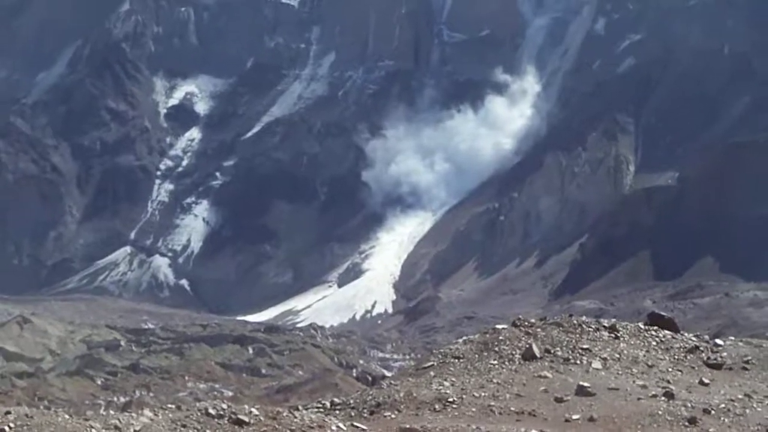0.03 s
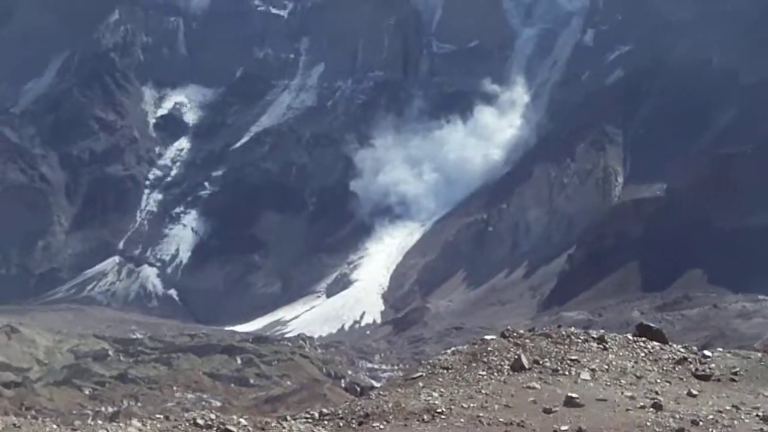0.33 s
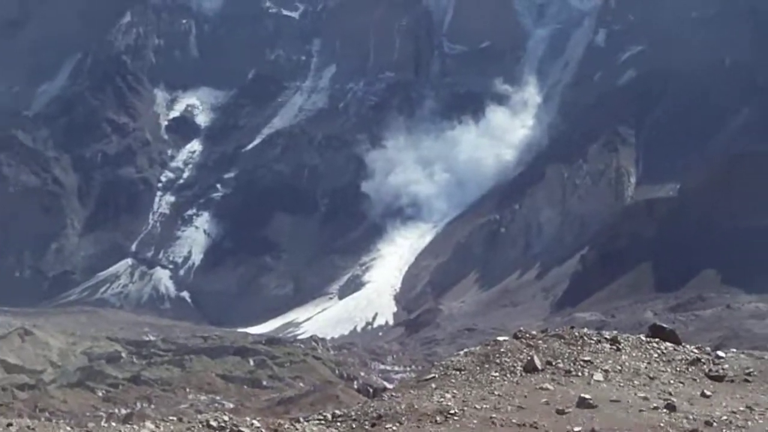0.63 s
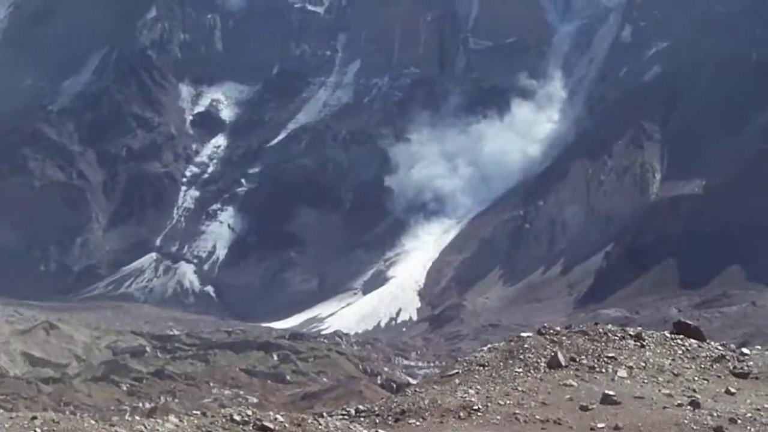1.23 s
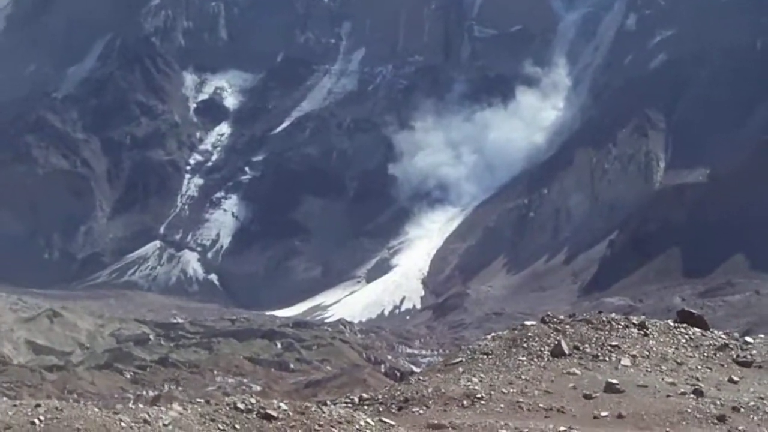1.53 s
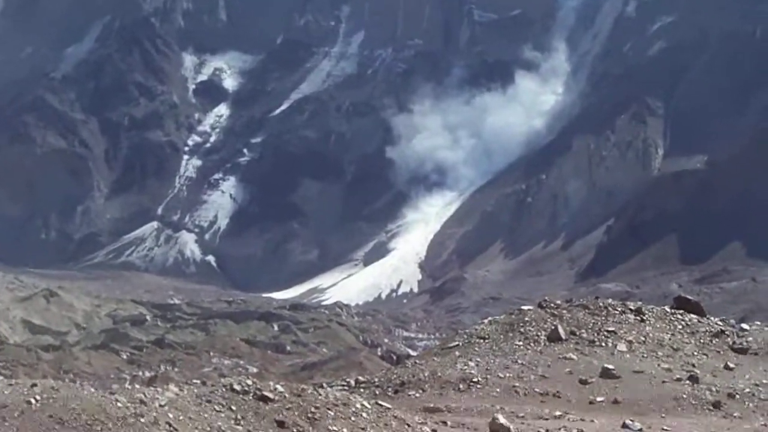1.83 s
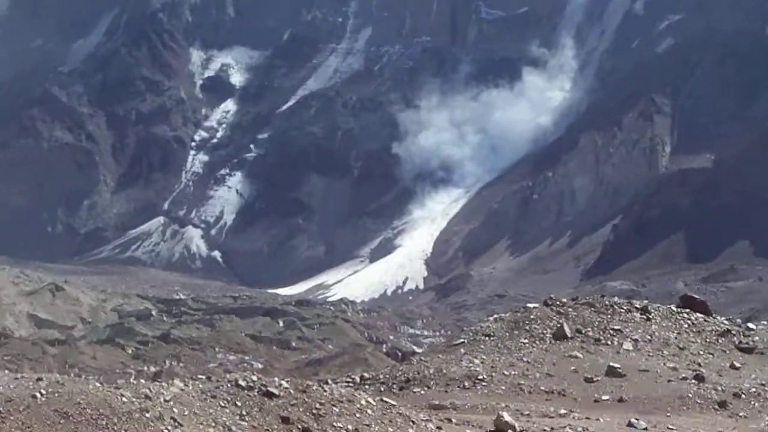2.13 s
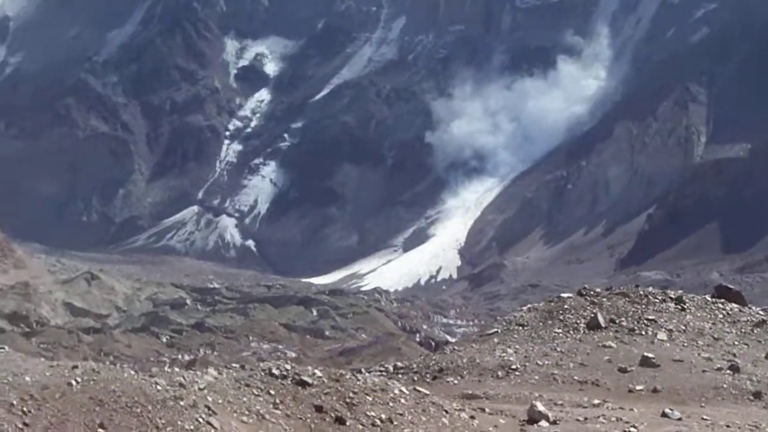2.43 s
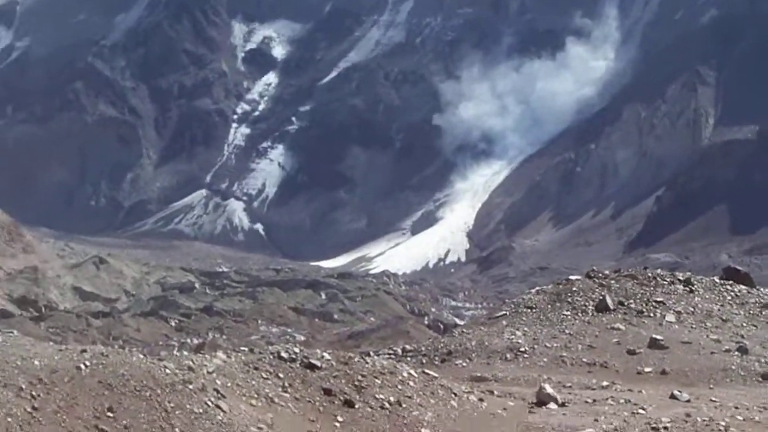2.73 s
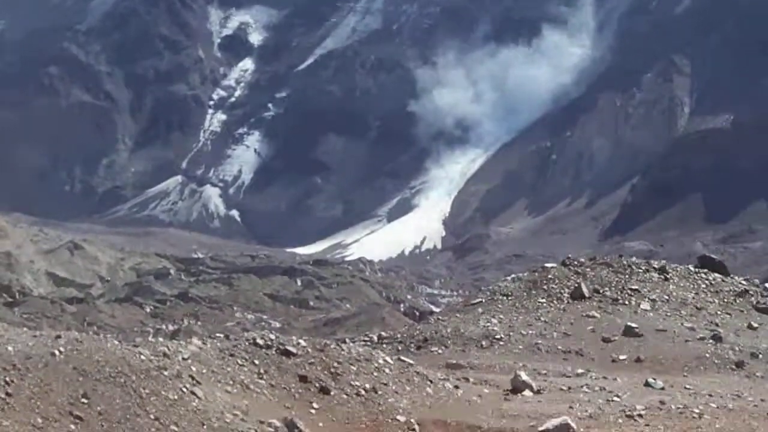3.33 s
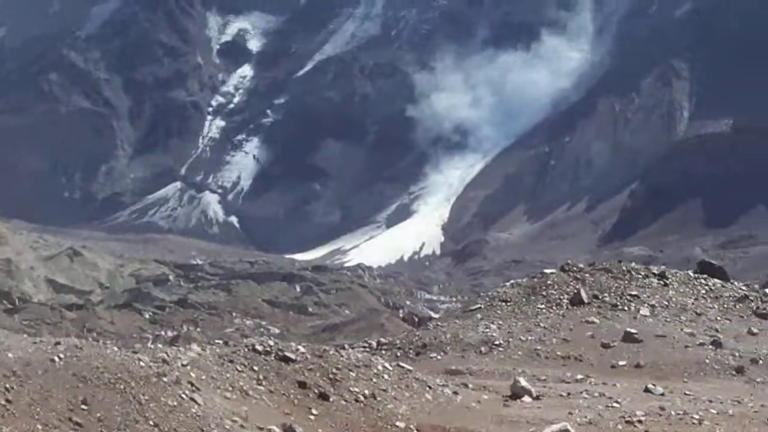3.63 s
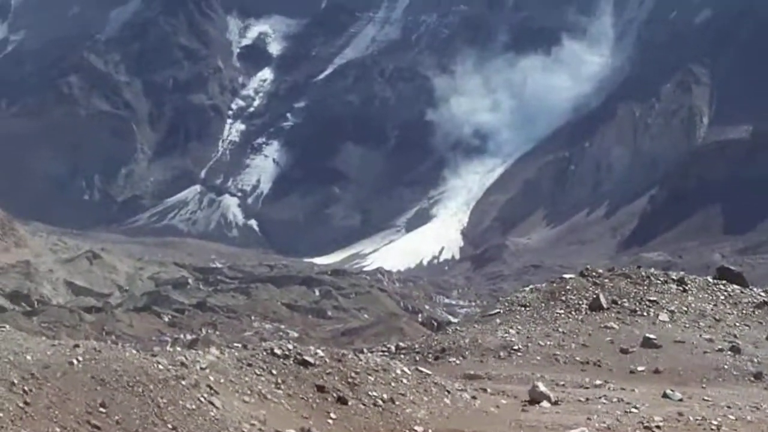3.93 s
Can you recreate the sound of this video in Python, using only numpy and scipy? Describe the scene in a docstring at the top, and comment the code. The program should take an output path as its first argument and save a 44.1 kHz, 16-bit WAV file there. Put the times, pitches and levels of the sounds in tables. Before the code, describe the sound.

Gusty wind buffets the microphone with fluttering thuds and crackles over a faint distant rumble.

```python
"""Gusty wind buffets a bare camera microphone on an open mountainside, over a faint distant rumble.
The rushing air flutters, and gets louder and brighter as it speeds up. Small swirls of air (eddies)
hit the microphone's opening as short thuds, and the opening crackles. Now and then, mostly in the
strongest gusts, pressure pushes the microphone to its limit and it goes dead for some milliseconds."""
import sys
import numpy as np
from scipy import signal
from scipy.fft import rfft, irfft
from scipy.io import wavfile
from scipy.ndimage import uniform_filter1d

SR = 44100
rng = np.random.default_rng(int(sys.argv[2]) if len(sys.argv) > 2 else 0)


def master(y):
    """Save y as 16-bit WAV."""
    cut = np.clip(np.atleast_2d(y).T, -1, 1)
    pcm = np.round(cut * 32767)  # scale
    wavfile.write(sys.argv[1], SR, pcm.astype(np.int16))


N = 176400  # 4 seconds

# How strongly the wind blows at the microphone: time_s, level_db
WIND_STRENGTH = [(0, -35.5), (0.09, -33), (0.135, -30), (0.2, -15), (0.27, -25.5), (0.37, -29),
                 (0.49, -21.5), (0.55, -37.5), (0.65, -41), (0.71, -23.5), (0.78, -33.5), (0.92, -41.9),
                 (1, -32), (1.05, -41), (1.17, -41.5), (1.23, -30), (1.31, -46), (1.41, -41.5), (1.47, -46),
                 (1.63, -46.5), (1.75, -42.5), (1.96, -39.5), (2.05, -30), (2.11, -41.5), (2.18, -32.5),
                 (2.26, -34), (2.33, -45), (2.41, -45.0), (2.47, -27.5), (2.56, -40.5), (2.77, -39),
                 (2.99, -42), (3.08, -45.5), (3.3, -30), (3.41, -42), (3.48, -38), (3.59, -42.5),
                 (3.76, -38), (4, -42.5)]
# Tone of the hiss at the microphone's opening: pitch_hz, level_db
HISS_TONE = [(1500, -20.5), (2900, 8), (3600, 3.5), (4150, -9.5), (5000, 1), (6000, 3), (7300, 6),
             (8200, -5.5), (9000, -35.5)]
# Bands of rushing air: pitch_hz, level_db (in the usual wind), growth_db_per_gust_db, flutter_db
AIR_BANDS = [(76, -45, 0.12, -4), (160, -42.5, 0.67, 2), (321, -39, 0.753, 4.5), (556, -42, 0.9852, 6),
             (1115, -53.5, 1.2357, 8), (2130, -80, 1.68, 8.5)]
# Tone of the far rumble: pitch_hz, level_db
RUMBLE_TONE = [(15, -10.5), (30, -13), (65, -3.5), (130, -2), (350, -5.5), (800, -23.5), (1600, -22),
               (3200, -37.5), (4200, -47.5), (9000, -66.5)]
# Eddies that hit the opening: peak_s, length_s, level_db, pitch_hz, edge_db (compared with the thud)
EDDY_HITS = [(0.05, 0.0049, -24, 490, -23), (0.079, 0.0036, -14, 710, -9), (0.0873, 0.01, -19, 587, -14),
             (0.165, 0.0072, -22.5, 530, -25), (0.1902, 0.0036, -12.5, 600.0, -8.5),
             (0.205, 0.0024, -12, 520.0, -9), (0.2163, 0.0026, -12.5, 537, -4),
             (0.23, 0.0018, -25.5, 510.0, -11), (0.2517, 0.0033, -17.5, 443, -19),
             (0.2878, 0.0029, -19, 533, -9), (0.2969, 0.0035, -12, 460, -12.5),
             (0.3106, 0.0074, -18.5, 470, -18), (0.338, 0.00091, -13, 530.0, -18.5),
             (0.3647, 0.0078, -22.5, 320.0, -23), (0.395, 0.002, -21, 430.0, -19),
             (0.407, 0.0023, -17.5, 560.0, -24), (0.4295, 0.0018, -3, 538, -17),
             (0.4463, 0.0025, -19, 690.0, -4.5), (0.4705, 0.0025, -16, 520, -19),
             (0.484, 0.0021, -11, 744, -14.5), (0.496, 0.0022, -12.5, 473, -30),
             (0.5102, 0.0028, -11, 514, -16), (0.536, 0.0036, -16, 400.0, -29.5),
             (0.5827, 0.009, -21.5, 404, -32.5), (0.6785, 0.006, -28.5, 520.0, -25),
             (0.6906, 0.0074, -28.5, 380, -14), (0.7058, 0.003, -20.5, 645, -14),
             (0.7137, 0.0018, -20, 458, -11), (0.7515, 0.023, -28.5, 620, -23),
             (0.7845, 0.0054, -26, 403, -29), (0.8228, 0.0029, -18, 566, -44),
             (0.9699, 0.0024, -16.5, 626, -22), (0.9873, 0.0056, -23, 433, -28),
             (1.0058, 0.0013, -16, 597, -16), (1.0813, 0.0051, -26.5, 376, -25),
             (1.216, 0.013, -34, 495, -19.5), (1.3555, 0.0024, -17.5, 400, -29),
             (1.401, 0.0076, -29, 400, -26), (1.4224, 0.006, -27.5, 500, -26),
             (1.6872, 0.0013, -25.5, 420, -35), (1.741, 0.0051, -32.5, 510, -27),
             (1.7602, 0.002, -15, 520, -18.5), (1.8046, 0.0054, -29.5, 382, -17),
             (1.8421, 0.0045, -19.5, 556, -21.5), (1.8695, 0.0032, -25, 560.0, -29),
             (1.914, 0.0038, -24.5, 590, -23.5), (2.0286, 0.0062, -24, 460, -18),
             (2.054, 0.01, -20.5, 545, -16), (2.1663, 0.006, -21, 548, -20),
             (2.191, 0.0084, -36, 560, -11.5), (2.258, 0.0094, -25, 580, -27),
             (2.2815, 0.0044, -24.5, 433, -36), (2.3427, 0.00086, -23, 455, -28),
             (2.4593, 0.012, -28, 530, -21), (2.486, 0.009, -26.5, 410.0, -31),
             (2.6238, 0.002, -20.5, 594, -21.5), (2.6896, 0.0056, -29.5, 414, -24),
             (2.8253, 0.0037, -23, 467, -34), (2.8876, 0.0035, -17.5, 570, -30.5),
             (2.9422, 0.0028, -18.5, 500.0, -24), (2.9975, 0.0028, -25, 403, -32),
             (3.011, 0.0037, -29.5, 537, -20.5), (3.098, 0.0019, -26, 400, -28),
             (3.131, 0.0021, -20.5, 430, -32), (3.14, 0.0027, -24, 506, -29),
             (3.2255, 0.0025, -20.5, 590.0, -13.5), (3.254, 0.0029, -35, 397, -26),
             (3.2919, 0.0019, -14, 583, -26), (3.3091, 0.0044, -20.5, 520.0, -23),
             (3.327, 0.0026, -21, 620, -16.5), (3.3788, 0.0037, -27.5, 476, -21),
             (3.557, 0.0024, -26, 362, -28), (3.6962, 0.0045, -25, 318, -31),
             (3.934, 0.0037, -28, 405, -25)]
# Sharp cracks at the opening: time_s, level_db
SHARP_CRACKS = [(0.0884, -45.5), (0.1897, -41), (0.2054, -35.5), (0.2153, -28.5), (0.2883, -29),
                (0.2976, -33.5), (0.309, -40), (0.4319, -39), (0.4843, -43), (0.5117, -43.5), (0.5719, -54),
                (0.6404, -56), (0.6772, -54), (0.7161, -47), (0.8156, -55), (0.8238, -53), (0.8978, -58),
                (0.9453, -57), (0.9744, -55), (1.0079, -50.5), (1.0823, -54), (1.2619, -62), (1.3081, -59),
                (1.3443, -51.5), (1.5764, -55), (1.6875, -61), (1.7404, -56), (1.8225, -54), (1.853, -53.5),
                (1.9335, -55), (1.9833, -58), (2.0489, -54), (2.062, -51), (2.149, -53), (2.1957, -49),
                (2.3422, -56), (2.5229, -64), (2.5451, -55), (2.5795, -56), (2.6928, -57), (2.7839, -62),
                (2.8689, -57), (2.8888, -50), (2.9422, -54), (3.0114, -55), (3.0338, -55), (3.0993, -56),
                (3.1619, -52), (3.1768, -57.5), (3.2086, -54), (3.2924, -58), (3.379, -55), (3.4947, -59),
                (3.5546, -58), (3.6095, -56.5), (3.6268, -56), (3.7512, -60), (3.7732, -54),
                (3.7856, -54.5)]
# Tone of the cracks: pitch_hz, level_db
CRACK_TONE = [(1200, -4), (2900, 3), (3600, -4.5), (4150, -4), (5000, 1), (7300, 3.5), (8300, -6),
              (9000, -21)]
# Moments when pressure blocks the microphone: start_s, length_s
DEAD_MOMENTS = [(.2196, .0055), (.2415, .009), (.3175, .0058), (.3315, .0047), (.3505, .012), (.372, .0107),
                (.4262, .004), (.4668, .003), (.503, .003), (.5305, .0075), (.736, .005), (.9618, .0082),
                (1.3455, .0035), (1.3805, .0055)]

USUAL_WIND_DB = -38.5  # gusts are counted up or down from this strength
HISS_GROWTH = 0.59  # dB that the hiss and the ticks gain for each dB of gust


def gain(db):
    """Turn decibels into a number to multiply a sound by."""
    return 10 ** (np.asarray(db) / 20)


def unit(x):
    """Scale a signal so that its average strength (RMS) is 1."""
    return x / np.sqrt(np.mean(x ** 2))


def shape_tone(x, points):
    """Turn each pitch up or down along a curve of (pitch_hz, level_db) points."""
    hz, db = np.array(points).T
    freqs = np.fft.rfftfreq(len(x), 1 / SR) + 1
    return irfft(rfft(x) * gain(np.interp(np.log(freqs), np.log(hz), db)), len(x))


def keep_band(x, hz, octaves):
    """Keep a broad, bell-shaped band of pitches around hz."""
    freqs = np.fft.rfftfreq(len(x), 1 / SR) + 1
    return irfft(rfft(x) * np.exp(-.5 * (np.log2(freqs / hz) / octaves) ** 2), len(x))


def wobble(rate_hz):
    """A smooth random wiggle; a higher rate makes it quicker."""
    freqs = np.fft.rfftfreq(N, 1 / SR)
    smooth = irfft(rfft(rng.standard_normal(N)) * np.exp(-2 * (freqs / rate_hz) ** 2), N)
    return unit(np.tanh(.5 * unit(smooth)))  # tanh tames the biggest swings


def add(out, start_s, sound):
    """Mix a short sound into out at the given time."""
    i = int(start_s * SR)
    lo, hi = max(i, 0), min(i + len(sound), N)
    out[lo:hi] += sound[lo - i:hi - i]


def rushing_air(gust_db, fast_share=0.59, hiss_db=-69, hiss_flutter_db=3.5):
    """Air churns at the opening: all bands flutter together, and higher ones grow more in a gust."""
    flutter = np.sqrt(1 - fast_share) * wobble(rate_hz=51) + np.sqrt(fast_share) * wobble(rate_hz=330)
    hiss = unit(shape_tone(rng.standard_normal(N), HISS_TONE))
    out = hiss * gain(hiss_db + HISS_GROWTH * gust_db + hiss_flutter_db * flutter)
    for hz, db, growth, flutter_db in AIR_BANDS:
        band = unit(keep_band(rng.standard_normal(N), hz, octaves=0.6))
        out += band * unit(gain(flutter_db * flutter)) * gain(db + growth * gust_db)
    return out


def far_rumble(level_db=-47):
    """The mountainside rumbles in the distance: a faint, steady, low noise."""
    return unit(shape_tone(rng.standard_normal(N), RUMBLE_TONE)) * gain(level_db)


def eddy_thuds(size=2048, rise_share=.33, trim_db=-1):
    """Each eddy is a few uneven swings of pressure that rise fast and die away."""
    out = np.zeros(N)
    t = (np.arange(size) - size / 2) / SR
    for peak_s, length_s, db, hz, edge_db in EDDY_HITS:
        side_s = length_s * np.where(t < 0, rise_share, 1 - rise_share)
        swell = .5 ** (.5 * (t / side_s) ** 2)
        body_noise, edge_noise = rng.standard_normal((2, size)) * swell
        thud = unit(keep_band(body_noise, hz, octaves=0.74))
        low_push = gain(-12.5) * unit(keep_band(body_noise, hz=162, octaves=0.63))
        rough_edge = gain(edge_db) * unit(keep_band(edge_noise, hz=1716, octaves=0.48))
        strength = np.sqrt(np.mean(swell ** 2)) * gain(db + trim_db)
        add(out, peak_s + t[0], (thud + low_push + rough_edge) * strength)
    return out


def crackle(gust_db, size=512, max_ticks=400, ticks_per_s=27, tick_db=-62.5, trim_db=-2):
    """The opening crackles: each loud crack or small tick is a bright snap on a little pressure step."""
    snaps, steps = np.zeros((2, N))
    t = np.arange(size) / SR
    times = np.cumsum(rng.exponential(1 / ticks_per_s, max_ticks))
    levels = tick_db + 1.5 * rng.standard_normal(max_ticks)
    ticks = [(s, db + HISS_GROWTH * gust_db[int(s * SR)]) for s, db in zip(times, levels) if s < N / SR]
    for time_s, db in list(SHARP_CRACKS) + ticks:
        fade_s = .00017 * 2 ** ((db - tick_db) / 14.5)  # 14.5 dB louder lasts twice as long
        fade = np.exp(-t / fade_s)
        start_s = time_s - fade_s / 2
        add(snaps, start_s, unit(rng.standard_normal(size) * fade) * gain(db + trim_db))
        step_db = -20.5 + min(db - tick_db - 4.5, 0)  # grows with the crack, up to a limit
        add(steps, start_s, rng.choice([-1, 1]) * fade * gain(step_db))
    return shape_tone(snaps, CRACK_TONE) + keep_band(steps, hz=860, octaves=0.87)


def dropouts(dead_db=-45.5, edge_s=0.00033):
    """The microphone hears almost nothing while the thin skin inside it is pushed against its stop."""
    t = np.arange(N) / SR
    sensitivity = np.ones(N)
    for start_s, length_s in DEAD_MOMENTS:
        sensitivity[(t > start_s) & (t < start_s + length_s)] = gain(dead_db)
    width = int(edge_s * SR)  # smooth twice to round off the edges of each gap
    return uniform_filter1d(uniform_filter1d(sensitivity, width), width // 2 + 1)


def scene():
    """Mix the wind sounds and the rumble into one channel; the dropouts cut them all."""
    gust_db = np.interp(np.arange(N) / SR, *np.array(WIND_STRENGTH).T) - USUAL_WIND_DB
    rumble = far_rumble()
    mix = rushing_air(gust_db) + rumble + eddy_thuds() + crackle(gust_db)
    return (mix * dropouts())[None]


def record(dry, top_hz=8550):
    """The camera cuts off the highest pitches."""
    return signal.sosfilt(signal.ellip(8, .2, 70, top_hz, fs=SR, output="sos"), dry)


dry = scene()
out = record(dry)
master(out)
```